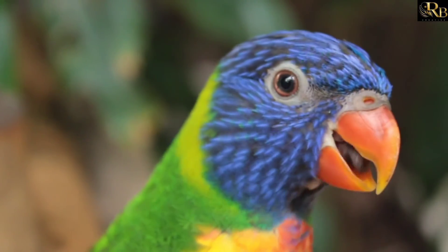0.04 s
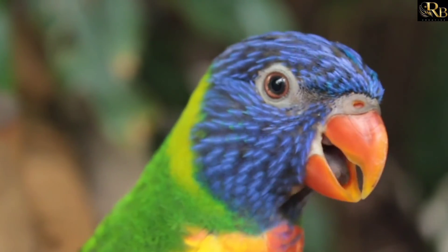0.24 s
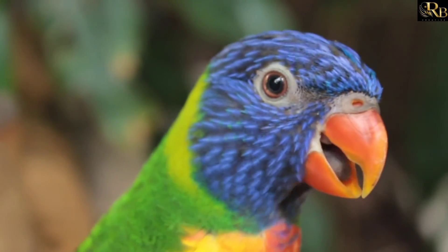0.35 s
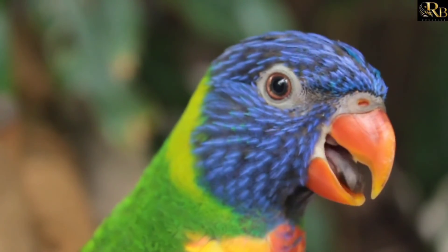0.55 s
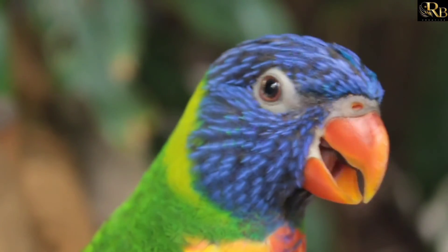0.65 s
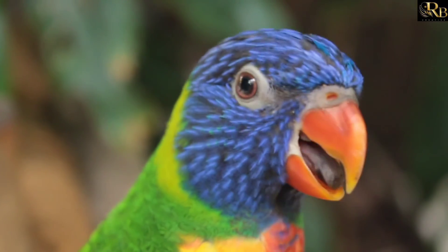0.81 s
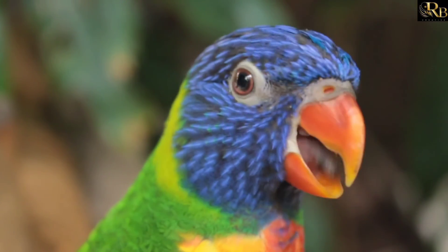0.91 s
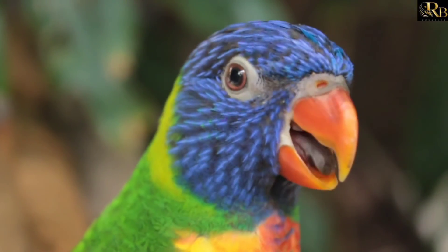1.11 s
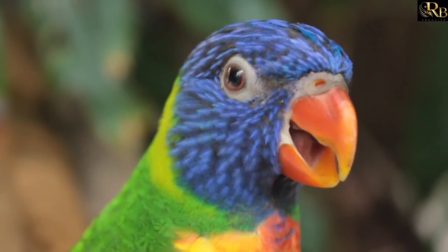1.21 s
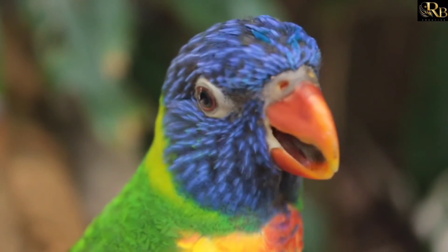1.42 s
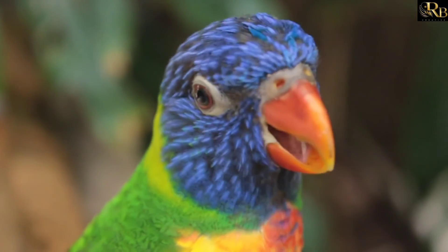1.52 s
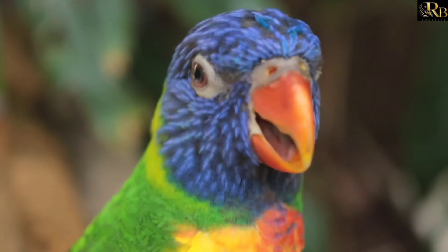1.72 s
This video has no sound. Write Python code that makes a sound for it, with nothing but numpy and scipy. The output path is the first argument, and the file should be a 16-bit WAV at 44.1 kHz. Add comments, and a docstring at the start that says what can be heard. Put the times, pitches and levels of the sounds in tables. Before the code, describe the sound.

A small parrot close by gives a loud, shrill chirp at about 0.2 seconds, running into a quick trill and warble until 0.5. A softer twitter follows from 0.6 to 0.8 seconds. At 1.1 come slightly raspy squeaks, ending in a short, clear whistle around 1.3 that leaves very faint echoes. A faint outdoor hiss lies underneath, dipping in the middle and then returning.

```python
"""Over faint outdoor hiss, a close lorikeet gives a shrill phrase at 0.2 s. Its syrinx, a self-sustained
oscillator, whistles with overtones, flips between two registers and croaks briefly an octave down.
The hiss sinks and a weak hum enters. A softer twitter follows at 0.6 s, then, as the hiss creeps back,
squeaks with a second croak at 1.1 s and a closing whistle. The surroundings reverberate after each
phrase; last come three far echoes and a faint bump."""
import sys
import numpy as np
from scipy import signal
from scipy.fft import rfft, irfft
from scipy.io import wavfile
from scipy.ndimage import uniform_filter1d

SR = 44100
rng = np.random.default_rng(int(sys.argv[2]) if len(sys.argv) > 2 else 0)


def pcm_store(signal):
    """Save signal as 16-bit PCM."""
    levels = np.round(np.clip(np.atleast_2d(signal), -1, 1) * 32767)
    wavfile.write(sys.argv[1], SR, levels.astype(np.int16).T)


N = 77175
T = np.arange(N) / SR
BAND_LIMIT_HZ = 15600


def amp(db):
    """Amplitude ratio for a level in decibels."""
    return 10 ** (np.asarray(db) / 20)


def unit_rms(x):
    """Normalisation to unit mean power."""
    return x / np.sqrt(np.mean(x ** 2) + 1e-20)


def wobble(rate_hz):
    """Random modulator: Gaussian noise low-passed at the given rate."""
    hz = np.fft.rfftfreq(N, 1 / SR)
    return unit_rms(irfft(rfft(rng.standard_normal(N)) / np.sqrt(1 + (hz / rate_hz) ** 8), N))


def gate(start, end, edge_s=.003):
    """Raised-cosine edges limit the spectral splatter of switching on and off."""
    return np.sin(np.pi / 2 * np.clip(np.minimum(T - start, end - T) / edge_s + .5, 0, 1)) ** 2


# Spectral density of the hiss: f/Hz, relative level/dB
HISS_SPECTRUM = [(130, -28), (280, -3.5), (800, -3), (1250, 0), (2200, -4.5), (3600, -11.5), (5500, -18),
                 (9000, -29.5), (12500, -41.5)]
# Envelope of the hiss: t/s, level/dB
HISS_ENVELOPE = [(0, -63), (.22, -62), (.28, -67.5), (.41, -75), (.44, -86), (.62, -83.5), (.73, -73.5),
                 (1.04, -67), (1.12, -59), (1.31, -64.5), (1.42, -60), (1.6, -65)]


def hiss():
    """Spectral shaping of white noise, under a slowly varying envelope."""
    hz, db = np.transpose(HISS_SPECTRUM)
    colour = amp(np.interp(np.log(np.fft.rfftfreq(N, 1 / SR) + 1), np.log(hz), db))
    noise = unit_rms(irfft(rfft(rng.standard_normal(N)) * colour, N))
    return noise * amp(np.interp(T, *np.transpose(HISS_ENVELOPE)))


def hum(start=.33, hz=45.7, db=-85, decay_db_per_s=9.5):
    """Exponential decay of a low sinusoid that builds up over two cycles."""
    age = T - start
    envelope = amp(db - decay_db_per_s * age) * np.clip(age * hz / 2, 0, 1)
    return np.sqrt(2) * envelope * np.sin(2 * np.pi * hz * T)


def bump(centre_s=1.655, width_s=.014, hz=297, db=-65):
    """A Gaussian tone pulse, heard as a soft bump."""
    envelope = amp(db) * np.exp(-((T - centre_s) / width_s) ** 2)
    return np.sqrt(2) * envelope * np.sin(2 * np.pi * hz * T)


# Frequency response of the surroundings: f/Hz, gain/dB
REVERB_COLOUR = [(3600, 0.5), (4700, -3), (6800, 0.5), (10000, -2.5)]


def reverberation(x, low_t60=.67, treble_t60=.4, early_t60=.23, slap_s=.02):
    """Convolution with dense early reflections, one distinct slap and a tail whose treble dies sooner."""
    t, hz = T[:SR], np.fft.rfftfreq(SR, 1 / SR)
    noise = rng.standard_normal(SR)
    low = signal.sosfiltfilt(signal.butter(4, 5500, fs=SR, output="sos"), noise)
    tail = low * amp(-60 * t / low_t60) + (noise - low) * amp(-60 * t / treble_t60)
    early = rng.standard_normal(SR) * amp(8 - 60 * t / early_t60)
    response = (tail + early) * (t > .0027)  # delay of the first reflection
    response /= np.linalg.norm(response)
    response[round(slap_s * SR)] += amp(-8)
    colour = amp(np.interp(hz, *np.transpose(REVERB_COLOUR)))
    return signal.fftconvolve(x, irfft(rfft(response) * colour, SR))[:N]


def tone_pulse(start, length, first_hz, last_hz, db):
    """A linear frequency sweep under a half-sine window."""
    progress = np.clip((T - start) / length, 0, 1)
    phase = 2 * np.pi * np.cumsum(first_hz + (last_hz - first_hz) * progress) / SR
    return np.sqrt(2) * amp(db) * np.sin(np.pi * progress) * np.sin(phase)


# Far echoes of the closing whistle: onset t/s, duration/s, level/dB
FAR_ECHOES = [(1.415, 0.022, -52.5), (1.463, 0.019, -56.5), (1.505, 0.027, -59.5)]


def far_echoes(hz=3110):
    """Distant reflections arrive late and weak, modelled as tone pulses at the closing pitch."""
    return sum(tone_pulse(start, length, hz, hz, db) for start, length, db in FAR_ECHOES)


# Flicks of the voice: onset t/s, duration/s, first f/Hz, last f/Hz, level/dB
REGISTER_FLICKS = [(0.248, 0.014, 3840, 4253, -45), (1.234, 0.019, 4100, 3570, -53.5)]


def flicks():
    """Register transition: as a note ends, the voice glides briefly in the high register."""
    return sum(tone_pulse(*row) for row in REGISTER_FLICKS)


# Croak spectrum at onset, harmonics 1 to 5: relative level/dB
CROAK_HARMONICS = [-3.5, 0.5, -4.5, -6.5, -16]
# Breaks of the voice: onset t/s, duration/s, centre f/Hz, level/dB
VOICE_BREAKS = [(0.2721, 0.013, 1363, -44), (1.122, 0.012, 1330, -53.5)]
JITTER_RATE_HZ = 466


def croak(start, length, hz, db, rise=.11, jitter=.025, tilt_db=-2.5):
    """Period doubling: the voice cracks to half its pitch in uneven cycles; high harmonics die sooner."""
    progress = np.clip((T - start) / length, 0, 1)
    pitch = hz * (1 + rise * (progress - .5) + jitter * wobble(JITTER_RATE_HZ))
    phase = 2 * np.pi * np.cumsum(pitch) / SR
    harmonics = sum(amp(db + offset + tilt_db * (k - 1.5) * progress) * np.sin(k * phase)
                    for k, offset in enumerate(CROAK_HARMONICS, 1))
    return np.sqrt(2) * gate(start, start + length) * harmonics


def noise_band(db, band_hz=(3150, 6370)):
    """A steady band of rough noise sounds under the phrase, between the voice's harmonics."""
    bandpass = signal.butter(3, band_hz, "bandpass", fs=SR, output="sos")
    return amp(db) * unit_rms(signal.sosfilt(bandpass, rng.standard_normal(N)))


def rasp(tone, phase, depth, rate_hz=190):
    """Random quadrature modulation broadens a spectral line at about constant power."""
    sidebands = wobble(rate_hz) * np.sin(phase) + wobble(rate_hz) * np.cos(phase)
    return (tone + depth * sidebands) / np.hypot(1, depth)


# Contours of the song: t/s, f/Hz, fundamental level/dB, second-harmonic level/dB, upper level/dB
LOUD_CHIRP = [(.189, 3003, -50, -77.5, -85), (.212, 2977, -42.5, -67.5, -71), (.221, 3087, -31, -65.5, -68),
              (.2245, 2751, -20.5, -46.5, -64.5), (.235, 2880, -17.5, -54, -75.5),
              (.247, 2920, -20, -40.5, -73), (.251, 3136, -25.5, -48, -74.5),
              (.255, 3250, -44.5, -88, -118)]  # first phrase
TRILL = [(.2855, 2916, -34.5, -54.5, -77), (.306, 2996, -27, -54, -84), (.318, 2775, -31.5, -45, -56.5),
         (.324, 3110, -28.5, -59, -84.5), (.334, 2870, -35.5, -60.5, -81.5),
         (.3435, 2860, -37.5, -68.5, -65), (.347, 2937, -25, -45, -79.5), (.359, 3003, -25, -40.5, -72),
         (.365, 3114, -22, -44.5, -83.5), (.370, 3320, -25, -56, -81)]
WARBLE = [(.369, 4286, -33.5, -77, -80), (.381, 4464, -34.5, -68.5, -71),
          (.3845, 4040, -40.5, -61.5, -82.5), (.388, 4330, -25.5, -61, -75),
          (.392, 3907, -37.5, -61.5, -85), (.396, 3350, -27.5, -55, -71), (.412, 3322, -26.5, -48, -79.5),
          (.419, 3426, -23, -57, -83), (.423, 4450, -34.5, -62.5, -70.5), (.440, 4310, -35, -63, -82),
          (.444, 3470, -29, -49, -82), (.465, 3252, -37, -53, -72), (.476, 3595, -32, -53, -88),
          (.482, 4434, -42.5, -80, -81), (.488, 4453, -38, -66, -84), (.497, 4480, -61.5, -85, -93)]
TWITTER = [(.622, 3513, -84.5, -92, -88), (.638, 3456, -62.5, -54, -63), (.647, 3423, -50.5, -51.5, -66.5),
           (.668, 3600, -67, -86, -91), (.673, 4550, -54, -76, -82), (.682, 3502, -53.5, -75, -75),
           (.688, 3600, -48, -80, -82.5), (.695, 4550, -42.5, -53, -96), (.699, 4620, -56, -54, -99),
           (.704, 3454, -50.5, -72, -71), (.716, 3440, -45.5, -56.5, -49.5), (.728, 3602, -45, -64, -83),
           (.732, 3650, -40, -71, -87), (.736, 4740, -38.5, -74, -91), (.744, 4637, -31.5, -56, -70),
           (.751, 4606, -40.5, -44, -83), (.761, 4520, -50, -56.5, -88), (.771, 3540, -49.5, -62.5, -91),
           (.779, 3606, -35.5, -64.5, -70), (.784, 3530, -37, -63, -52)]  # second phrase
SCRAPE = [(.785, 3554, -45, -52, -54.5), (.797, 3165, -40.5, -54.5, -53), (.804, 3300, -59, -54.5, -69)]
SQUEAKS = [(1.097, 2610, -66, -61.5, -77.5), (1.105, 2595, -42.5, -42, -78), (1.111, 2485, -48, -46.5, -70),
           (1.118, 2374, -35.5, -31, -56.5), (1.127, 2117, -44, -64.5, -66), (1.134, 2623, -76, -62, -76),
           (1.148, 2811, -47.5, -50, -61.5), (1.158, 2588, -43.5, -49.5, -60), (1.170, 2430, -36, -36, -61),
           (1.179, 2462, -52, -40.5, -74), (1.182, 3078, -46, -72.5, -80.5),
           (1.200, 2874, -44, -50.5, -56.5), (1.212, 2849, -41, -44.5, -67),
           (1.220, 2980, -27.5, -57.5, -64), (1.230, 3109, -32, -66, -73), (1.241, 3135, -43, -79, -87.5)]  # third phrase
WHISTLE = [(1.242, 3060, -37.5, -68.5, -83), (1.249, 3039, -27, -55.5, -77), (1.262, 3090, -28, -44, -55),
           (1.271, 3105, -28, -40, -51), (1.289, 3090, -37, -55, -71.5), (1.305, 3114, -38, -59.5, -73),
           (1.337, 3083, -42, -63, -75), (1.357, 3070, -62.5, -69, -92)]
# Harmonics 3 to 5: level/dB relative to the contour's upper level
UPPER_HARMONICS = [-8, -8.5, -15]
# Voicing: contour, reverberation gain/dB, rms jitter/%, rms flutter/dB, gain of overtones in the treble gap/dB
# (overtones in this band drop out in the later phrases), noise-band level/dB
SONG = [(LOUD_CHIRP, -33.5, .15, 0.38, 3.3, -79), (TRILL, -34, 0.17, 0.91, 2, -75.5),
        (WARBLE, -28, 0.53, 0.97, 2, -87), (TWITTER, -7.5, 0.49, 2.9, -32, -87.5),
        (SCRAPE, -11, .6, 1.94, -31, -80), (SQUEAKS, -13, 0.52, 0.43, -28, -65.5),
        (WHISTLE, -17.5, .1, 0.57, -31, -75)]
REGISTER_SPLIT_HZ, TREBLE_GAP_HZ, FLUTTER_RATE_HZ = 3900, (11400, 14500), 102


def syrinx(contour, jitter_percent, flutter_db, treble_gap_db, band_db, slur=.15):
    """Self-sustained oscillation: one harmonic series per register, cross-faded at each flip."""
    times, hz, first_db, second_db, upper_db = np.transpose(contour)
    levels = [first_db, second_db] + [upper_db + offset for offset in UPPER_HARMONICS]
    voice = np.zeros(N)
    for register in (hz < REGISTER_SPLIT_HZ, hz >= REGISTER_SPLIT_HZ):
        if not register.any():
            continue
        share = np.sin(np.pi / 2 * np.interp(T, times, register.astype(float))) ** 2
        own_pitch = np.interp(T, times[register], hz[register])
        pitch = (1 - slur) * own_pitch + slur * np.interp(T, times, hz)  # bends toward the other register
        jitter = jitter_percent / 100 * wobble(JITTER_RATE_HZ)
        phase = 2 * np.pi * np.cumsum(pitch * (1 + jitter)) / SR
        flutter = amp(flutter_db * wobble(FLUTTER_RATE_HZ))
        for k, level in enumerate(levels, 1):
            in_gap = (k * pitch > TREBLE_GAP_HZ[0]) & (k * pitch < TREBLE_GAP_HZ[1])
            db = np.interp(T, times, level) + treble_gap_db * in_gap
            gain = share * amp(db) * (k * pitch < BAND_LIMIT_HZ)
            tone = np.sin(k * phase) * flutter
            if k > 1:
                tone = rasp(tone, k * phase, depth=.3 if k == 2 else .7)
            voice += uniform_filter1d(gain, size=90) * tone  # 2 ms smoothing avoids clicks
    return (np.sqrt(2) * voice + noise_band(band_db)) * gate(times[0], times[-1])


def scene():
    """Superposition of the bird, its reflections and the background, in one channel."""
    bird = sum(croak(*row) for row in VOICE_BREAKS) + flicks()
    for contour, reverb_db, *voicing in SONG:
        voice = syrinx(contour, *voicing)
        bird += voice + amp(reverb_db) * reverberation(voice)
    return (hiss() + hum() + bump() + far_echoes() + bird)[None]


def record(dry):
    """Band limiting by a linear-phase low-pass filter."""
    lowpass = signal.firwin(511, BAND_LIMIT_HZ, window=("kaiser", 9), fs=SR)
    return signal.oaconvolve(dry, lowpass[None], "same")


dry = scene()
out = record(dry)
pcm_store(out)
```